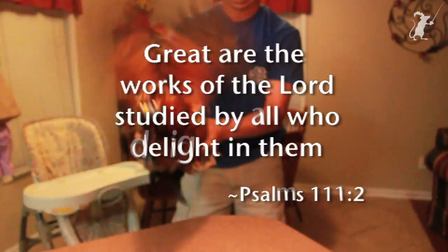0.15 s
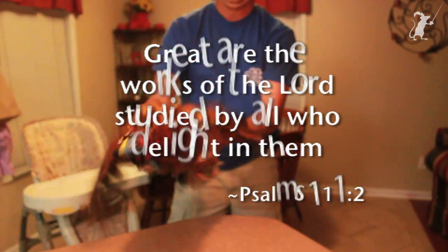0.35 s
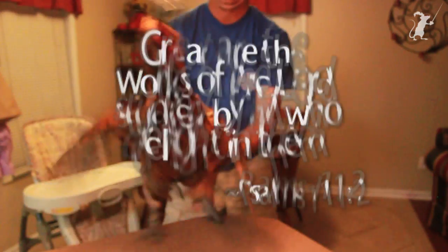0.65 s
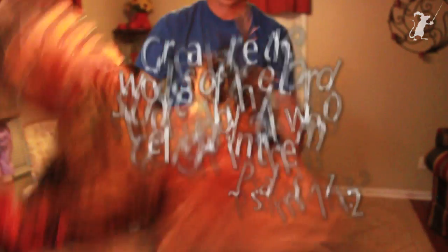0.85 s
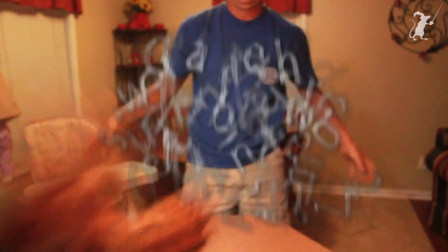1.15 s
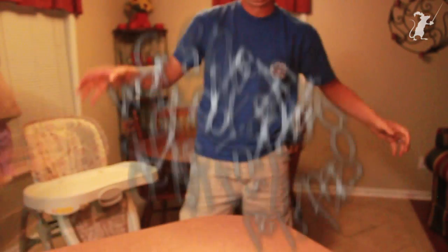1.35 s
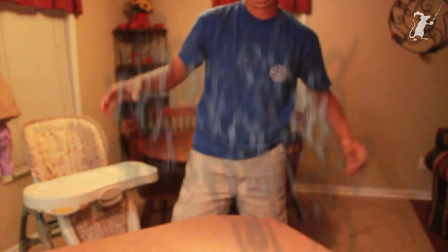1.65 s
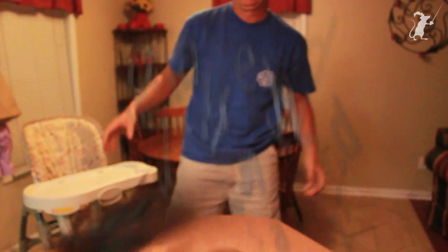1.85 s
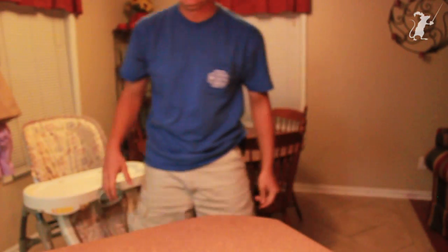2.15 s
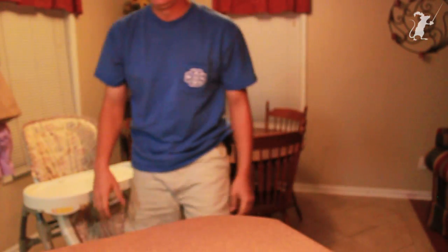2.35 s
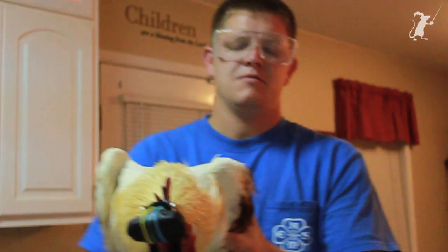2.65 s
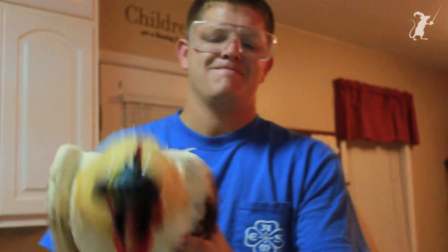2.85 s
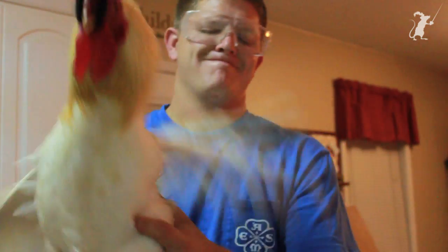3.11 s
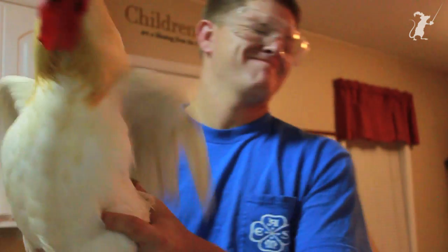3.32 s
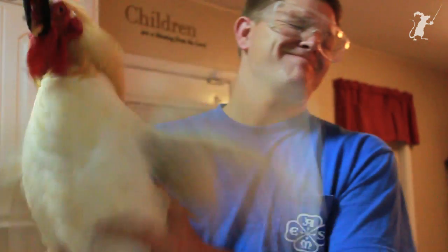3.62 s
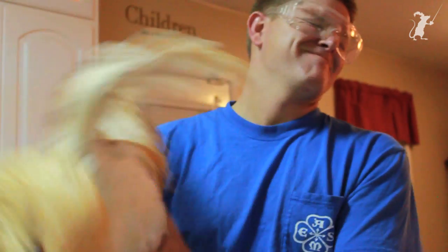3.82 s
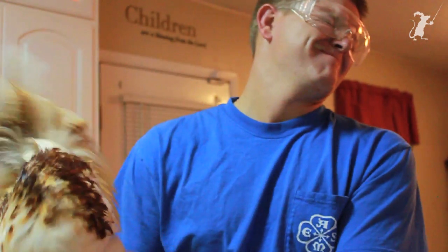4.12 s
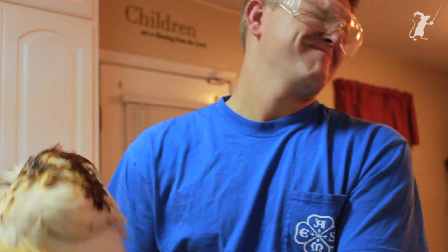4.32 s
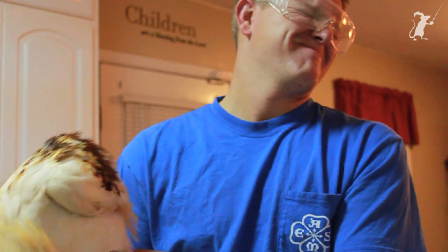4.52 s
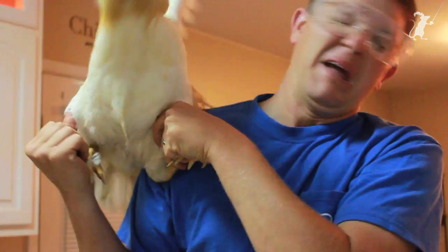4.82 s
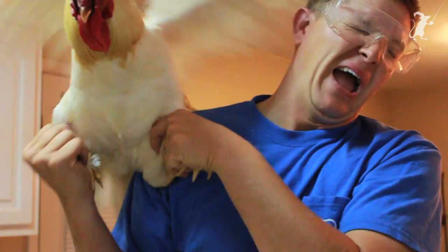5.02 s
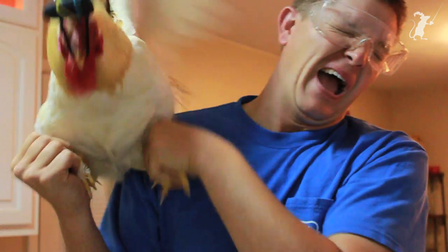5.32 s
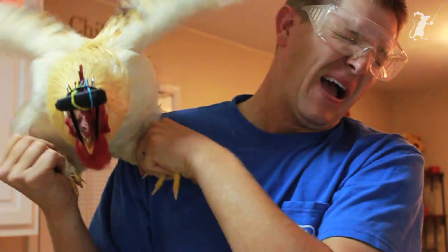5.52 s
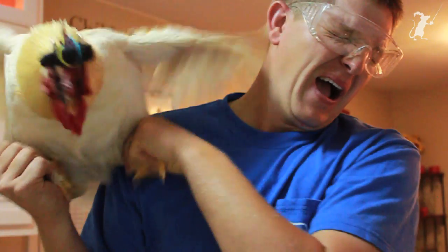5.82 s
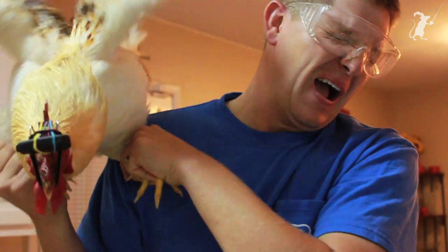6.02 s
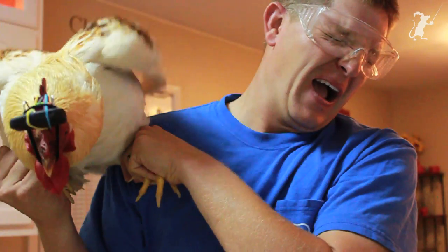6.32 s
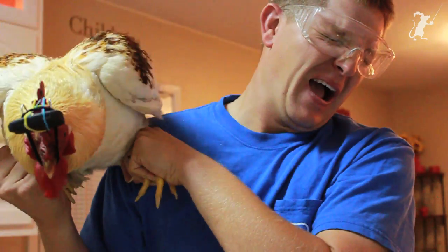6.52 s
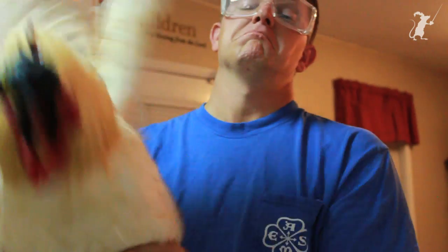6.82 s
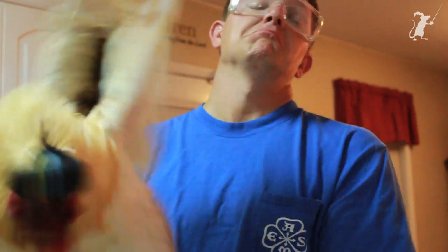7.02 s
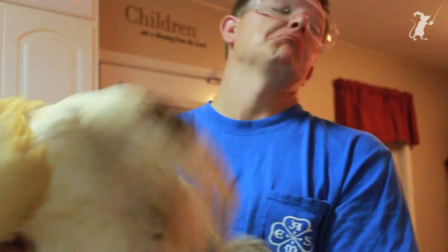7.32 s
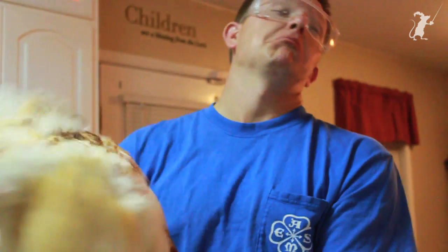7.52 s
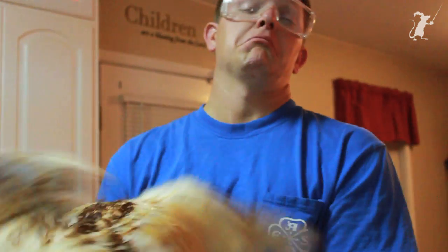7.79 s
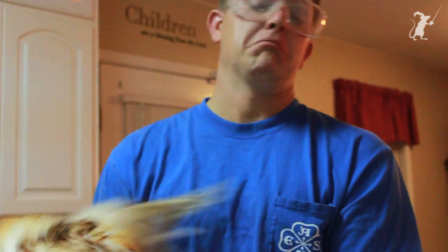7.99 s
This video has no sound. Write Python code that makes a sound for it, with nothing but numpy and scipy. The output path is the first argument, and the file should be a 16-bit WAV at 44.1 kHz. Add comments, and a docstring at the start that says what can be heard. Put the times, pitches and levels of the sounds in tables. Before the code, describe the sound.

A chicken thrashes its wings and lets out one harsh rising squawk close by, then low clucks and scattered flapping in a quiet kitchen.

```python
"""A quiet appliance hum comes first, then a wing flap, clucks and one long squawk, all close by in a kitchen.
The chicken's voice is a buzz of pulses and air puffs, coloured by throat, windpipe and beak.
Wings crack and thud as short noise bursts, and feathers swish as flickering noise with small ticks.
Puffs of low noise push on the microphone, and a claw knock is a short burst of mid-range noise.
Hard walls add short tails to voice and wings, over room rumble, hum and a brief faint note."""
import sys
import numpy as np
from scipy import signal
from scipy.io import wavfile
from scipy.ndimage import uniform_filter1d

SR = 44100
rng = np.random.default_rng(int(sys.argv[2]) if len(sys.argv) > 2 else 0)


def digitize_waveform(pressure):
    """Quantize a signal to 16-bit integers and store it at the path in sys.argv[1].

    Rows of a 2-D input are taken as channels; values are limited to [-1, 1].
    """
    field = np.atleast_2d(pressure).T
    bounded = np.clip(field, -1, 1)
    quanta = np.round(bounded * 32767).astype(np.int16)
    wavfile.write(sys.argv[1], SR, quanta)


N = 359415

# Short cries: start t/s, rise t/s, hold t/s, effort level/dB, first pitch f/Hz, held pitch f/Hz,
# roughness 0-1, beak brightness level/dB, throat resonance (times the pitch),
# neck posture (factor on the windpipe and beak resonances)
CLUCK_ROWS = [(0.32, 0.00079, 0.038, -16.5, 441, 404, 0.15, 0, 2.01, 1.007),
              (0.401, 0.015, 0.0041, -22, 358, 365, 0.4, -1.5, 1.01, 0.97),
              (0.813, 0.02, 0.026, -17, 347, 397, 0.11, -1, 1.9, 0.94),
              (1.001, 0.02, 0.036, -30, 251.6, 336, 0.23, -2.5, 1.01, 1.03),
              (1.202, 0.025, 0.02, -20.5, 198.8, 293.4, 0.5, -4.5, 1.61, 1.02),
              (1.383, 0.03, 0.026, -22, 303.4, 256.3, 0.53, -6.5, 1.71, 1),
              (2.561, 0.0023, 0.018, -45, 297, 297, 0.57, -7, 2.7, 1.1),
              (2.599, 0.0051, 0.017, -36.5, 1087, 1200, 0.27, -4, .98, 0.94),
              (2.622, 0.0013, 0.0084, -25, 282, 303, 0.63, -19, 3.2, 1.07),
              (2.688, 0.019, 0.0022, -32, 309, 328.7, 0.34, -15.5, 1.72, 0.94),
              (3.116, 0.0092, 0.0008, -23, 1330, 760, 0.3, -11.5, 1.07, 0.73),
              (3.123, 0.0018, 0.0089, -18, 424, 401.6, 0.5, -9.5, 1.95, 0.94),
              (3.304, 0.012, 0.012, -27.5, 1135, 644.6, 0.3, -8, .99, 1.03),
              (3.767, .012, .012, -22, 920, 572.6, 0.53, -5.5, 1.01, 0.98),
              (3.927, .021, 0.028, -23, 180.3, 420.7, 0.39, -1, 1.9, 0.93),
              (4.164, 0.024, 0.011, -27, 196, 370.2, 0.34, -4, 1.01, 1.034),
              (4.389, 0.022, 0.01, -23.5, 159.2, 368.8, 0.21, -4, 1.01, 0.99),
              (4.672, 0.025, 0.0012, -27, 230, 324, 0.25, -9.5, 1.9, 0.94),
              (7.748, 0.015, 0.0063, -35.5, 393, 600, 0.3, -6.5, 1.8, 0.97),
              (7.778, 0.0087, .002, -33, 620, 595, 0.17, -6.5, 1.95, 1),
              (7.793, 0.0045, 0.0055, -32, 600, 394, 0.42, -18, 1.95, 1.1),
              (7.858, 0.014, 0.0017, -39.5, 995, 693, 0.52, -18, 1.01, 0.89),
              (8.068, 0.011, 0.017, -21, 236, 378.8, 0.36, -11, .95, 0.82)]
# A thin, clean squeak with little echo: columns as for the short cries
SQUEAK_ROW = (3.757, 0.005, .007, -22, 1320, 1345, 0.08, -5, 2.01, 1.07)
# The long squawk: t/s, effort level/dB, pitch f/Hz, throat resonance (times the pitch),
# roughness 0-1, beak brightness level/dB
SQUAWK_POINTS = [(.424, -23, 386, 2.02, 0.4, -7), (.446, -4.5, 492, 2.02, 0.26, -9),
                 (0.472, -12.5, 483, 2.02, 0.61, -1.5), (0.499, -8.5, 502.1, 2.02, 0.46, -3.5),
                 (0.516, -13, 532.3, 2.02, .2, 0), (0.531, -15, 584, 1.95, 0.3, 4.5),
                 (0.547, -10, 630.7, 1.55, 0.06, -1), (0.577, -8.5, 634, 1.5, .3, -2),
                 (0.601, -21.5, 618, 1.3, 0.5, -4.5), (.624, -25, 589.5, 1.1, .3, 13),
                 (0.643, -20.5, 610.8, 1.03, 0.15, 8.5), (.652, -17.5, 659.3, 1.03, 0.6, 14),
                 (.668, -10.5, 742, 1.03, 0.42, 7.5), (0.679, -6.5, 796, 1.03, 0.03, -6),
                 (0.707, -19.5, 784, 1.03, 0.45, -2.5), (0.719, -33.5, 810, 1.03, 0.4, -17)]
# Windpipe and beak resonances before the neck factor: f/Hz, width f/Hz, level/dB before rasp and brightness
BEAK_RESONANCES = [(1085, 330, 2), (1760, 300, -1), (2580, 400, 7), (3750, 420, 1), (4780, 420, -1),
                   (6300, 900, -5), (7900, 1100, -7), (12000, 2400, -15)]
# Wing slaps: t/s, crack level/dB, low thud against the crack level/dB (both trimmed in slap)
WING_SLAPS = [(0.1966, -19.5, -12.5), (0.249, -10.5, -10), (0.323, -1.5, -18), (0.401, -13, -16),
              (0.465, -7, -28), (.604, -14.5, -25), (1.2988, -11.5, -17), (1.3047, -23, -16),
              (3.169, -27, -15), (3.5353, -13, -7), (3.6273, -15, -8), (3.6765, -13.5, -20),
              (3.695, -13.5, -8), (4.7668, -24, -5.5), (6.7014, -22, -17.5), (6.9904, -8.5, -20),
              (7.1229, -27, -11), (7.233, -8, -18.5), (7.3517, -12, -52), (7.3597, -26, -51),
              (7.411, -20.5, -46), (7.4246, -16.5, -47), (7.5982, -15.5, -34)]
# Wing strokes, feathers sweeping through air: full sweep t/s, level/dB (raised in swish), rise t/s, hold t/s
WING_STROKES = [(0.196, -32.5, 0.00098, 0.027), (0.315, -42, 0.015, 0.023), (0.46, -38, 0.091, 0.078),
                (0.646, -28, 0.092, 0.0071), (0.821, -35, .01, 0.027), (1.211, -42, 0.011, 0.062),
                (1.424, -46, 0.18, 0.0093), (2.23, -56.5, 0.099, 0.031), (2.853, -52, 0.072, 0.022),
                (3.021, -41, 0.056, 0.1), (3.277, -43, 0.13, 0.039), (3.451, -47.5, 0.042, 0.05),
                (3.526, -38.5, 0.013, .24), (3.94, -44, 0.017, .005), (4.772, -33.5, 0.0021, 0.024),
                (4.87, -41, 0.053, .01), (5.177, -48.5, 0.051, 0.028), (5.249, -40.5, .01, 0.044),
                (5.849, -44.5, 0.034, 0.1), (6.603, -48, 0.0079, 0.14), (6.947, -39.5, 0.073, 0.011),
                (7.128, -47.5, 0.12, 0.018), (7.606, -36, .006, 0.009), (7.89, -41.5, 0.029, 0.011),
                (8.14, -40.5, 0.04, .02)]
# Faint background rustle and hiss between the strokes, with level steps: t/s, level/dB (raised in swish)
BACKGROUND_RUSTLE = [(.19, -75), (.2, -36), (1.1, -65), (1.6, -55.5), (2.5, -71.5), (2.55, -58.5),
                     (3.9, -56.5), (4.76, -73.5), (4.8, -49.5), (6.57, -68.5), (6.62, -58.5), (7.3, -45),
                     (7.45, -53.5), (8.15, -51.5)]
# Tone colour of the feather noise, only its shape counts: f/Hz, level/dB per Hz
FEATHER_COLOUR = [(88, -48), (150, -10), (606, -3.5), (864, -5.5), (2310, -5), (3040, -3.5), (7660, -9.5),
                  (13600, -7), (15600, -10.5), (16500, -50)]
# Air pushed onto the microphone: start t/s, level/dB, length t/s
AIR_GUSTS = [(1.265, -23.5, 0.022), (3.11, -43, 0.048), (3.68, -45, 0.04), (3.752, -35.5, 0.041),
             (7.11, -48, .06), (7.228, -38, 0.052), (7.89, -45, 0.051)]
# How fast the kitchen's echoes die: f/Hz, time to fall by 60 dB t/s
KITCHEN_DECAY = [(200, 0.44), (600, 0.39), (1500, 0.44), (4000, 0.35), (10000, 0.094)]
# Room tone, which jumps and swells: t/s, rumble level/dB, change of the hum level/dB
ROOM_LEVELS = [(0, -59.5, 0), (.19, -60.5, -2), (.3, -41.5, -38), (1.6, -51.5, -27), (1.7, -48, 0.5),
               (3.391, -58.5, -2.5), (3.41, -65, -11), (3.901, -60.5, -28.5), (4.75, -69, -6),
               (4.8, -46, 9), (6.6, -47.5, 9), (6.61, -61.5, -9), (8.15, -54.5, -33)]
# Tone colour of the rumble, only its shape counts: f/Hz, level/dB per Hz
RUMBLE_COLOUR = [(15, -66), (25, -12), (49, -17), (87, -9.5), (177, -6.5), (313, -4), (358, -5),
                 (787, -11.5), (1730, -14.5), (2040, -21.5), (14000, -34), (16500, -53.5)]
# Hum lines of the appliance: f/Hz, level/dB before the change over time
HUM_LINES = [(59.2, -62.5), (118.4, -68.5), (177.6, -64), (220.7, -67.5), (349.9, -70.5)]

SQUEAK_WALLS_DB = -8  # the walls get less of the squeak
THROAT_WIDTH_HZ, THROAT_LOWEST_HZ = 356, 400
SQUAWK_NECK = 0.91  # factor on the windpipe and beak resonances
RASP_ABOVE_HZ, RASP_DB_PER_DB, RASP_EFFORT_DB = 5500, .5, -10  # the top resonances open up with effort
# Flying at the microphone, the bird strains harder than its level tells
FLIGHT_END_S, FLIGHT_RASP_DB = 1.1, 6
RISE_DB, RELEASE_S, RELEASE_DB = -13.5, 0.0123, -11.5  # effort at the start of a cluck; its dying away
SHUT_DB, ONSET_ROUGH = -4.5, 0.19  # a cluck starts with the beak half shut and the voice unsteady
FALLING_RATIO, FALLING_SOFT = 1.3, .55  # a cluck falling from a high, tense pitch starts less softly
STROKE_FALL_DB_PER_S = 204
# Claws meeting a hard surface
LANDING_S, LANDING_DB, LANDING_HZ, LANDING_DECAY_S = 1.872, -30, 1500, .035
NOTE_START_S, NOTE_END_S, NOTE_HZ, NOTE_DB = 1.7, 2.55, 320, -56  # a faint steady note
HISS_DB, EDGE_HZ = -69.5, 15900  # microphone self-noise; upper limit of the sound


def gain_of(db):
    """Turns decibels into a factor."""
    return 10 ** (np.asarray(db) / 20)


def evened(x):
    """Scales a signal to an average (rms) strength of 1."""
    return x / np.sqrt(np.mean(x ** 2) + 1e-20)


def filtered(x, order, hz, kind):
    """Cuts a signal down to part of its frequencies with a Butterworth filter."""
    return signal.sosfilt(signal.butter(order, hz, kind, fs=SR, output="sos"), x)


def read_spectrum(points, hz):
    """Reads a table of values against frequency, on a log-frequency axis."""
    f, value = np.transpose(points)
    return np.interp(np.log(hz + 1), np.log(f + 1), value)


def unit_power_db(colour, hz):
    """Reads a tone colour in dB and shifts it to mean power 1."""
    db = read_spectrum(colour, hz)
    return db - 10 * np.log10(np.mean(gain_of(db) ** 2))


def add(mix, s, sound):
    """Mixes a sound in at second s."""
    part = mix[round(s * SR):][:len(sound)]
    part += sound[:len(part)]


def resonate(x, hz, width_hz):
    """Makes a resonance of gain 1: shifts its frequency curve to zero, smooths, and shifts back."""
    turn = np.exp(2j * np.pi * np.cumsum(hz * np.ones(len(x))) / SR)
    r = np.exp(-np.pi * width_hz / SR)
    smooth = signal.lfilter([1 - r], [1, -r], x / turn + 1e-18)
    return 2 * (turn * smooth).real


def resonate_twice(x, hz, width_hz, second_width_hz):
    """Two resonances in a row at the same pitch fall off more steeply to the sides."""
    return resonate(resonate(x, hz, width_hz), hz, second_width_hz)


def noise(field_db, size):
    """Builds noise from random short-time spectra shaped by field_db(Hz, s); 0 dB flat gives rms 1."""
    hop = size // 4
    hz = np.fft.rfftfreq(size, 1 / SR)[:, None]
    t = np.arange(N // hop + 5) * hop / SR
    a, b = rng.standard_normal((len(t), len(hz), 2)).T
    spectra = a + 1j * b
    flat = signal.istft(spectra, nperseg=size, noverlap=size - hop)[1]
    shaped = signal.istft(spectra * gain_of(field_db(hz, t)), nperseg=size, noverlap=size - hop)[1]
    return shaped[:N] / np.sqrt(np.mean(flat ** 2))


def cry(neck, rows):
    """Jittered pulses and puffs of air pass the throat, windpipe and beak."""
    s, *columns = np.transpose(rows)
    t = np.arange(s[0], s[-1] + 0.0069, 1 / SR)
    effort_db, hz, tuned_to, rough, bright_db = (np.interp(t, s, c) for c in columns)
    rough = np.clip(rough, 0, 1)
    strained_db = effort_db + FLIGHT_RASP_DB * (s[0] < FLIGHT_END_S)
    jitter, shimmer, air = rng.standard_normal((len(t), 3)).T

    # Count of voice cycles, with an unsteady pitch
    turns = np.cumsum(hz * (1 + 1.335 * rough * uniform_filter1d(jitter, 100))) / SR - hz[0] * .002
    # Harder effort snaps the membranes shut faster, so the pulses reach higher
    reach_hz = 2500 * gain_of(.55 * (strained_db + 25))
    pulses = np.zeros(len(t))
    for k in range(1, 40):
        pulses += np.cos(2 * np.pi * k * turns) * (k * hz < EDGE_HZ) / (1 + k * hz / reach_hz)
    air = resonate(air, 0, np.median(reach_hz) * 2)
    puffs = (.35 + np.exp(-(turns % 1) / .3)) * air
    drive = (1 - rough) * evened(pulses) + rough * evened(puffs)
    # A strained voice also wavers in strength from pulse to pulse
    drive = drive * gain_of(5 * rough * evened(uniform_filter1d(shimmer, 130)))
    # and slips in and out of strong-weak pulse pairs
    pairing = np.tanh(evened(uniform_filter1d(jitter, 500)))
    drive = drive * (1 + 1.2 * rough * pairing * np.cos(np.pi * turns))

    throat_hz = np.maximum(tuned_to * hz, THROAT_LOWEST_HZ)
    throat = resonate_twice(drive, throat_hz, THROAT_WIDTH_HZ, 1.79 * THROAT_WIDTH_HZ)
    rasp_db = RASP_DB_PER_DB * (strained_db - RASP_EFFORT_DB)
    beak = np.zeros(len(t))
    for k, (f, width, db) in enumerate(BEAK_RESONANCES):
        gain = gain_of(db + rasp_db * (f > RASP_ABOVE_HZ))
        beak += (-1) ** k * gain * resonate_twice(drive, f * neck, width, width)
    sound = filtered(evened(throat) - gain_of(bright_db) * evened(beak), 2, 220, "high")
    edges = np.clip(np.minimum(t - t[0], t[-1] - t) / 0.00091, 0, 1)  # avoids clicks
    return s[0], -gain_of(effort_db) * evened(sound) * edges


def cluck(start, rise, hold, db, first_hz, hz, rough, bright_db, tuned_to, neck):
    """Effort swells and the beak opens while the pitch slides to its held note, holds, and dies away."""
    s = start + np.cumsum([0, abs(rise) + 1 / SR, abs(hold) + 1 / SR, RELEASE_S])
    soft = FALLING_SOFT if first_hz > FALLING_RATIO * hz else 1
    effort_db = db + np.array([soft * RISE_DB, 0, 0, RELEASE_DB])
    pitch_hz = [first_hz, hz, hz, hz]
    roughness = rough + np.array([ONSET_ROUGH, 0, 0, 0])
    beak_db = bright_db + np.array([soft * SHUT_DB, 0, 0, SHUT_DB])
    return cry(neck, np.transpose([s, effort_db, pitch_hz, [tuned_to] * len(s), roughness, beak_db]))


def slap(db, thud_db):
    """A thin crack of stiff feathers and its rustle, with a duller blow of the wing under it."""
    t = np.arange(round(0.057 * SR)) / SR
    rustle, blow = rng.standard_normal((len(t), 2)).T
    snap = np.sign(rustle) * np.exp(-t / .0005)
    crack = filtered(snap + 0.24 * rustle * np.exp(-t / 0.02), 1, 1200, "high")
    blow_shape = np.exp(-t / 0.0065) * (1 - np.exp(-t / 0.00083))
    blow = evened(filtered(blow, 2, [170, 1300], "band")) * blow_shape
    return gain_of(db - 1.5) * (crack + gain_of(thud_db + 7.0) * blow)


def sweep():
    """Level of the feather noise: strokes rise, hold and fall away over the background rustle and hiss."""
    t = np.arange(0, N + 32, 32) / SR
    s, db, rise, hold = np.transpose(WING_STROKES)[:, :, None]
    rise_db = np.minimum(20 * (t - s) / np.maximum(rise, 1 / SR), 0)
    fall_db = STROKE_FALL_DB_PER_S * np.maximum(t - s - hold, 0)
    strokes = (gain_of(db + rise_db - fall_db) ** 2).sum(0)
    background = gain_of(np.interp(t, *np.transpose(BACKGROUND_RUSTLE))) ** 2
    return np.interp(np.arange(N) / SR, t, np.sqrt(strokes + background))


def swish():
    """Wide noise that flickers as feather barbs slip, with scattered ticks."""
    # One flicker value for each hop of the noise
    flicker = evened(uniform_filter1d(rng.standard_normal(N // 64 + 5), size=3))
    air = noise(lambda hz, t: unit_power_db(FEATHER_COLOUR, hz) + 2.0 * flicker, size=256)
    tick_gain = gain_of(3.3 * np.minimum(rng.exponential(1, N), 4))
    # About 400 ticks a second, each one sample long
    ticks = tick_gain * rng.choice([-1, 1], N) * (rng.random(N) < 400 / SR)
    return gain_of(3.5) * sweep() * (air + gain_of(-8.0) * evened(ticks))


def landing(db, hz, decay):
    """Claws on a hard surface: a short scratchy knock of band-limited noise that dies away."""
    t = np.arange(round(.1 * SR)) / SR
    knock = filtered(rng.standard_normal(len(t)), 3, [hz / 3, hz * 1.67], "band")
    return gain_of(db) * evened(knock) * np.exp(-t / decay)


def gust(db, length):
    """Air pushed onto the microphone: a lumpy puff of low noise that swells and fades."""
    count = round(length * SR)
    lumps = filtered(rng.standard_normal(SR // 5), 2, [45, 170], "band")[-count:]
    return gain_of(db) * evened(lumps) * np.hanning(count)


def kitchen(x, count=3):
    """Wall echoes are sparse taps of random sign, each band dying at its own speed."""
    at, out = np.arange(200, SR - 20, 20), np.zeros(N)
    for k in range(count):
        taps = np.zeros(SR)
        taps[at + rng.integers(0, 20, len(at))] = rng.choice([-1., 1.], len(at))
        hz, t, spectra = signal.stft(taps, SR, nperseg=256)
        fade = gain_of(-60 * t / read_spectrum(KITCHEN_DECAY, hz)[:, None])
        tail = signal.istft(spectra * fade, SR, nperseg=256)[1]
        # Several tails take turns, so no single ring stands out
        turn = np.sqrt(2 / count) * np.cos(np.pi * (12.0 * np.arange(N) / SR + k / count))
        out += signal.fftconvolve(x * turn, tail / np.linalg.norm(tail))[:N]
    return out


def room_tone():
    """Appliance rumble with slightly wavering hum lines, and a faint note for a while."""
    t = np.arange(N) / SR
    s, db, hum_db = np.transpose(ROOM_LEVELS)
    steady = noise(lambda hz, u: unit_power_db(RUMBLE_COLOUR, hz) + 0 * u, size=2048)
    rumble = gain_of(np.interp(t, s, db)) * steady
    hum = np.zeros(N)
    for hz, line_db in HUM_LINES:
        waver = evened(resonate_twice(rng.standard_normal(N), hz, 24, 24))
        hum += gain_of(line_db) * (np.sqrt(2) * np.sin(2 * np.pi * hz * t) + hz / 400 * waver)
    note = gain_of(NOTE_DB) * evened(resonate(rng.standard_normal(N), NOTE_HZ, 3.1))
    note = note * (t > NOTE_START_S) * (t < NOTE_END_S)
    return rumble + gain_of(np.interp(t, s, hum_db)) * hum + note


def scene():
    """Bird and wings in the kitchen over the room tone."""
    voice, squeak, wings, air = np.zeros((4, N))
    for row in CLUCK_ROWS:
        add(voice, *cluck(*row))
    add(voice, *cry(SQUAWK_NECK, SQUAWK_POINTS))
    add(squeak, *cluck(*SQUEAK_ROW))
    for s, *blow in WING_SLAPS:
        add(wings, s, slap(*blow))
    add(wings, LANDING_S, landing(LANDING_DB, LANDING_HZ, LANDING_DECAY_S))
    for s, *puff in AIR_GUSTS:
        add(air, s, gust(*puff))
    voice_tail = gain_of(-10.5) * kitchen(voice + gain_of(SQUEAK_WALLS_DB) * squeak)
    wing_tail = gain_of(-10.0) * kitchen(wings)
    return (voice + squeak + wings + voice_tail + wing_tail + air + swish() + room_tone())[None]


def record(dry):
    """Microphone hiss and bass roll-off, a soft overload on the loudest peaks, then the band limit."""
    heard = dry + gain_of(HISS_DB) * rng.standard_normal(N)
    heard = np.tanh(filtered(heard, 2, 38, "high"))
    band_limit = signal.firwin(511, EDGE_HZ, window=("kaiser", 9), fs=SR)
    return signal.oaconvolve(heard, band_limit[None], "same")


dry = scene()
out = record(dry)
digitize_waveform(out)
```